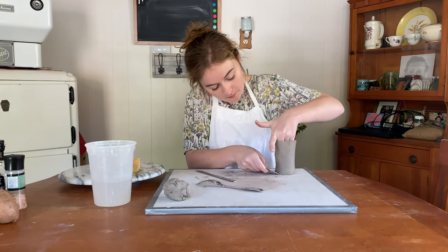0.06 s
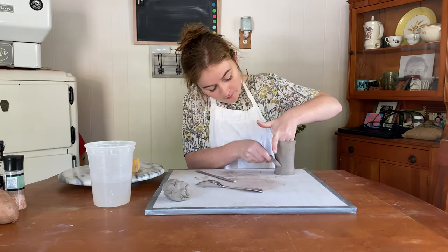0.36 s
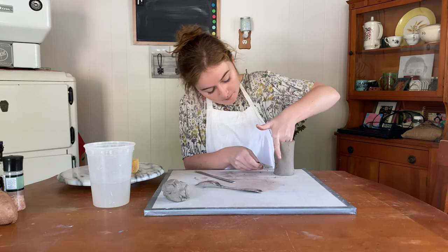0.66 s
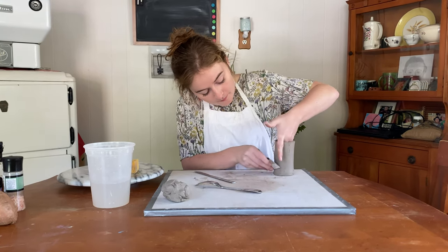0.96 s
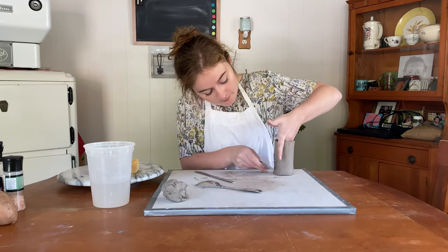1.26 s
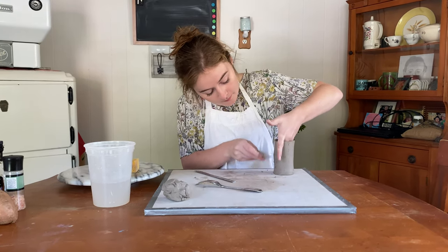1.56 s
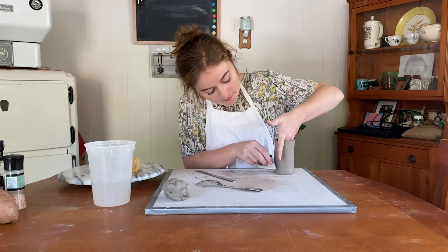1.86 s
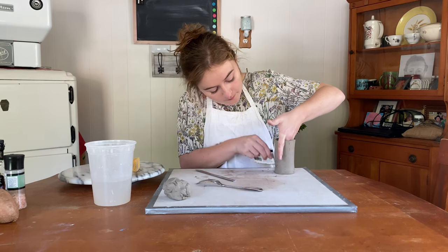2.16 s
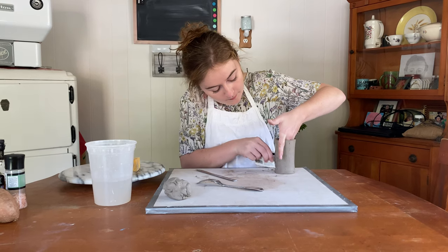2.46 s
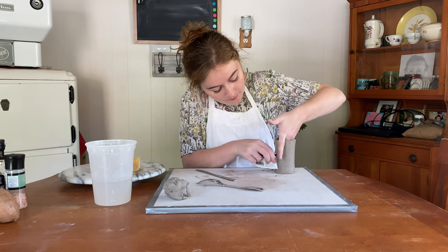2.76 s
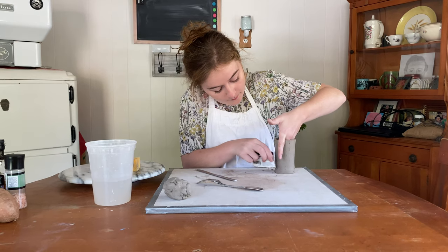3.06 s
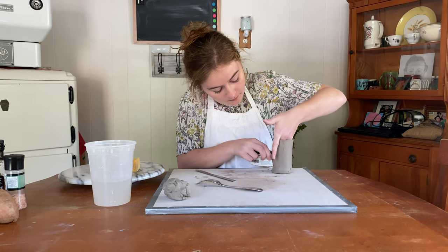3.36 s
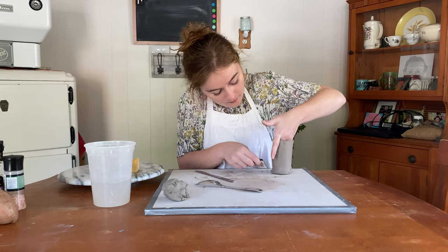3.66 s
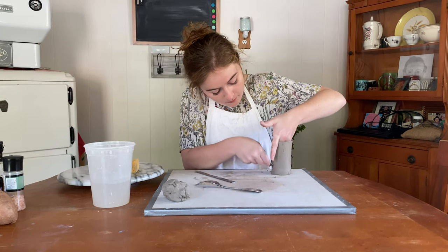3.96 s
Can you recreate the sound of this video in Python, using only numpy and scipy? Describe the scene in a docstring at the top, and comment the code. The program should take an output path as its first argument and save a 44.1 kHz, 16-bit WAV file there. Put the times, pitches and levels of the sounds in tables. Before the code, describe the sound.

A small tool scrapes soft clay in short, gritty strokes, close up in a kitchen, starting faintly around 0.3 seconds. Light taps join from 1.2 seconds and are loudest between 2 and 3, with tiny wet ticks just after 3. One faint, longer stroke comes near 3.9. Throughout, a distant engine drones through the walls with a wash of traffic, its rumble swelling around 2 seconds.

```python
"""A kitchen table, heard close through a stereo pair of microphones.
From the start a distant engine drones through the walls, with its low rumble and a wash of traffic.
A small tool scrapes soft clay in short gritty strokes that stick and slip, ringing briefly in the room.
Light taps and wet ticks join in, loudest between two and three seconds; one faint, longer stroke ends it."""
import sys
import numpy as np
from scipy import signal
from scipy.fft import rfft, irfft
from scipy.io import wavfile

SR = 44100
rng = np.random.default_rng(int(sys.argv[2]) if len(sys.argv) > 2 else 0)


def generate_wav(signal):
    """Clip the signal to [-1, 1] and save it as 16-bit WAV at the path in sys.argv[1]."""
    frames = np.transpose(np.atleast_2d(signal))
    scaled = np.clip(frames, -1, 1) * 32767
    pcm = np.round(scaled).astype(np.int16)
    wavfile.write(sys.argv[1], SR, pcm)


N = 176400
T = np.arange(N) / SR
FREQ_HZ = np.arange(N // 2 + 1) * SR / N

# Spectrum of the clay's fine grit, in strokes and wet ticks: frequency_hz, gain_db
GRIT_SPECTRUM = [(1500, -35), (4000, -7), (6500, -5), (8500, -10.5), (10500, 7.5), (12500, -4.5),
                 (14500, 6.5), (17000, 0)]


def undb(db):
    """Decibels to gain."""
    return 10 ** (np.asarray(db) / 20)


def unit(x):
    """Scale to rms 1."""
    return x / np.sqrt(np.mean(x ** 2))


def curve(rows, column=1):
    """One column of a table, joined by straight lines in time."""
    rows = np.array(rows)
    return np.interp(T, rows[:, 0], rows[:, column])


def pan(left_db):
    """Microphone gains, the left one left_db above the right."""
    return undb(np.array([[left_db], [-left_db]]) / 2)


def wander(rate_hz):
    """Smooth random motion of rms 1."""
    return unit(irfft(rfft(rng.standard_normal(N)) * np.exp(-(FREQ_HZ / rate_hz) ** 2), N))


def colour(x, spectrum):
    """Causal filter through (frequency_hz, gain_db) points that keeps the power of white noise."""
    hz, db = np.array(spectrum).T
    gain = unit(undb(np.interp(np.log(FREQ_HZ + 1), np.log(hz), db)))
    cepstrum = irfft(np.log(gain), N)
    fold = 1 + np.sign(N // 2 - np.arange(N))  # gives minimum phase
    fold[0] = 1
    return irfft(rfft(x) * np.exp(rfft(cepstrum * fold)), N)


def ring(x, modes):
    """Damped resonances of alternating sign that keep the power of white noise."""
    response = sum((-1) ** k * undb(db) * 1j * FREQ_HZ * width
                   / (hz ** 2 - FREQ_HZ ** 2 + 1j * FREQ_HZ * width)
                   for k, (hz, width, db) in enumerate(modes))
    return irfft(rfft(x) * response / np.sqrt(np.mean(abs(response) ** 2)), N)


def diffuse(spectrum, apart_hz):
    """Noise from all round: alike at both microphones in the bass, unrelated above apart_hz."""
    likeness = 1 / (1 + (FREQ_HZ / apart_hz) ** 2)
    mid, side = rfft(rng.standard_normal((2, N)))
    mid, side = mid * np.sqrt((1 + likeness) / 2), side * np.sqrt((1 - likeness) / 2)
    return colour(irfft(np.array([mid + side, mid - side]), N), spectrum)


def room_tone():
    """The faint, steady hiss of the kitchen's still air."""
    # Spectrum of the air: frequency_hz, gain_db
    spectrum = [(200, 13.5), (1000, 0.5), (2200, 5.5), (2800, -4), (4500, -6.5), (6500, -10.5),
                (8500, -17.5), (12000, -16.5), (14000, -27.5), (16000, -26)]
    return undb(-75.5) * diffuse(spectrum, apart_hz=500)


def traffic():
    """A wash of traffic comes through the walls and excites the modes of the room."""
    # Rise and fall of the wash: time_s, relative_level_db
    levels = [(0, -58.5), (.4, -59), (.9, -56.5), (1.3, -57), (1.65, -57), (2.0, -60), (2.45, -56.5),
              (3.0, -60), (3.5, -61), (4, -63.5)]
    # Traffic as heard indoors: frequency_hz, gain_db
    spectrum = [(60, -8.5), (130, 12.5), (170, 4.5), (230, 9), (285, 6), (320, 0.5), (420, -1.5), (520, -5),
                (750, -3.5), (1000, -5), (1400, -11.5), (1800, -21.5), (2400, -30.5), (3000, -40.5),
                (6000, -59.5)]
    # Room modes: frequency_hz, width_hz, gain_db
    room_modes = [(284.3, 17, -3), (392.7, 53, -4), (608, 9.1, 2), (755, 78, -7), (916, 170, -13)]
    wash = diffuse(spectrum, apart_hz=278)
    resonance = undb(-11.5) * ring(rng.standard_normal((2, N)), room_modes)
    level_db = curve(levels) + 4.5 + .5 * wander(18)
    return (wash + resonance) * undb(level_db) * pan(left_db=0.75)


def engine_rumble():
    """The distant engine's low rumble through the walls, swelling midway, a little to the left."""
    # Swell of the rumble: time_s, relative_level_db
    levels = [(0, -62), (.35, -62), (.7, -59), (.85, -56), (1.15, -54), (1.5, -52), (1.95, -48), (2.2, -51),
              (2.4, -50), (2.8, -52), (2.9, -55), (3.3, -55), (3.6, -57), (4, -58)]
    # Spectrum of the rumble: frequency_hz, gain_db
    spectrum = [(20, -32), (32, -24.5), (42, -4.5), (54, 6), (64, 8), (75, -6), (100, -0.5), (140, -14.5),
                (200, -24.5), (400, -76.5)]
    return diffuse(spectrum, apart_hz=308) * undb(curve(levels) + 2.3) * pan(left_db=2.5)


def engine_drone():
    """The engine's unevenly sinking note, a little to the right, with fainter tones that come and go."""
    # Main engine note: time_s, pitch_hz, relative_level_db
    note = [(0.0, 118, -39), (0.42, 114.4, -37), (0.66, 114.6, -44.5), (0.77, 115, -37), (1.06, 113.1, -38),
            (1.17, 114.9, -55), (1.24, 98.5, -62.5), (1.41, 101.7, -48.5), (1.46, 110, -49.5),
            (1.53, 112, -41.5), (2.17, 112, -43), (2.26, 123.9, -54.5), (2.35, 109.1, -47),
            (2.55, 109.1, -42.5), (2.87, 110, -54), (3.03, 107.9, -41), (3.92, 104.6, -40.5),
            (4.0, 103.9, -41)]
    # Fainter engine tones: pitch_hz, wander_hz, peak_s, swell_s, level_db
    tones = [(190.5, 1.3, 2.226, 0.35, -50), (191.7, 2, 2.7, 1, -55.5), (191.4, 3.1, 0.73, 0.14, -59.5),
             (248.3, 6, 2.0, 0.48, -55), (281.3, 4, 1.95, 0.28, -60.5), (255.6, 2.2, .45, 0.34, -62),
             (250.6, 3, 2.84, 0.37, -58.5), (238.3, 4, 3.514, 0.97, -61.5), (221, 2.6, 1.4, 0.21, -66),
             (129.15, 6, 2.09, 1, -53), (85.6, 1.6, 0.71, .45, -50.5), (49.88, 3, 2.7, 0.11, -47.5)]
    pitch_hz = curve(note, column=1) * (1 + 0.0036 * wander(2.7))
    level_db = curve(note, column=2) + 0.5 + 1.5 * wander(26)
    drone = np.sqrt(2) * np.sin(2 * np.pi * np.cumsum(pitch_hz) / SR) * undb(level_db)
    for hz, wander_hz, peak_s, swell_s, db in tones:
        phase = 2 * np.pi * np.cumsum(hz + wander_hz / 2 * wander(3)) / SR
        flutter = undb(1.5 * wander(18))
        swell = np.exp(-((T - peak_s) / swell_s) ** 2)
        drone = drone + unit(np.cos(phase) * flutter) * undb(db) * swell
    return drone * pan(left_db=-3)


def kitchen(x):
    """Direct sound at the two microphones, then a short room tail whose treble dies sooner."""
    low_t60_s, treble_t60_s, gap_s, tail_db = 0.25, 0.19, 0.0013, -2
    t = T[:SR // 2]
    noise = rng.standard_normal((2, len(t)))
    low = signal.sosfilt(signal.butter(1, 4000, fs=SR, output="sos"), noise)
    tail = (low * undb(-60 * t / low_t60_s) + (noise - low) * undb(-60 * t / treble_t60_s)) * (t > gap_s)
    tail /= np.sqrt(np.sum(tail ** 2) / 2)
    # The highest treble reaches the right microphone first.
    lag_s = 0.00012 * np.clip(.5 + 2 * (FREQ_HZ / 7000 - 1), 0, 1)
    left = irfft(rfft(x) * np.exp(-2j * np.pi * FREQ_HZ * lag_s), N)
    return np.array([left, x]) + undb(tail_db) * signal.fftconvolve(x[None], tail, axes=1)[:, :N]


def tool_ring(force):
    """The tool's short hollow ring, with a fainter, longer ring from nearby reflections."""
    # Damped tool resonances: frequency_hz, width_hz, gain_db
    tool_modes = [(1220, 100, -7.5), (1840, 200, 4.5), (2126, 170, 1), (3100, 200, -23), (4020, 280, -18),
                  (4900, 400, -26.5)]
    # Narrow peaks from early reflections: frequency_hz, width_hz, gain_db
    reflection_peaks = [(1659, 25, -2), (1927, 5.1, 0.5), (2177, 14, -2), (2180, 16, -12), (2360, 32, -7.5)]
    return ring(force, tool_modes) + undb(-10.5) * ring(force, reflection_peaks)


def snap(start_s, fade_s=.0008):
    """A very short crackle of unit energy."""
    burst = rng.standard_normal(N) * (T >= start_s) * np.exp(-np.clip(T - start_s, 0, .1) / fade_s)
    return burst / np.sqrt(np.sum(burst ** 2))


def wet_ticks():
    """Wet clay lets go with a tiny bright tick."""
    # Clay letting go: start_s, energy_db
    ticks = [(1.785, -69.5), (3.071, -55), (3.093, -48), (3.354, -53.5)]
    return colour(sum(undb(db) * snap(start_s) for start_s, db in ticks), GRIT_SPECTRUM)


def tapping():
    """The tool knocks on the clay: each blow snaps and sets it ringing."""
    # Taps of the tool: start_s, ring_db, snap_db
    taps = [(0.327, -67, -40.5), (1.2225, -38.5, -41), (1.2265, -40, -52), (1.577, -37.5, -51),
            (2.164, -32, -37.5), (2.185, -41.5, -48), (2.197, -50, -31), (2.526, -43.5, -51),
            (2.574, -30, -31), (2.599, -33, -30.5), (2.996, -35, -34), (3.0725, -29, -39),
            (3.084, -44, -58.5), (3.227, -51.5, -58.5), (3.356, -59.5, -48), (3.879, -43.5, -69)]
    # Spectrum of a tap's snap: frequency_hz, gain_db
    snap_spectrum = [(400, -17), (1000, 1), (2200, -3.5), (2800, -3.5), (3800, 2), (4500, -5), (5500, -8.5),
                     (7500, -18.5), (16000, -40)]
    blows, crackle = np.zeros((2, N))
    for start_s, ring_db, snap_db in taps:
        blows[int(start_s * SR)] += undb(ring_db)
        crackle += undb(snap_db) * snap(start_s)
    return tool_ring(blows) + colour(crackle, snap_spectrum)


def grains(per_s=13000, spread_db=2.5, grip_db=2.15, grip_hz=55):
    """Dense tiny impacts of uneven size, bunched as the clay grips and yields."""
    size_db = spread_db * rng.standard_normal(N) + grip_db * wander(grip_hz)
    hits = rng.random(N) < per_s / SR
    return unit(hits * rng.standard_normal(N) * undb(size_db))


def stick_slip(slips_per_s=135, jitter=.2, fade_cycles=0.16):
    """The edge catches and slips: each cycle gives a fading pulse and one sharp jolt."""
    cycles = np.cumsum(slips_per_s * (1 + jitter * wander(90))) / SR
    pulses = unit(np.exp(-(cycles % 1) / fade_cycles))
    onsets = np.diff(np.floor(cycles), prepend=0)
    return pulses, unit(onsets * undb(wander(150)))


def scraping():
    """Close up, the edge drags through grains of clay; when it chatters, each slip jolts the tool."""
    # Tool strokes, levels relative: start_s, length_s, start_db, end_db, grit_db, ring_db, chatter_share
    strokes = [(0.339, 0.083, -73.5, -71.5, -6, -5, 0.07), (0.421, .02, -71.5, -58.5, -3, -4, 0.07),
               (0.451, 0.044, -68.5, -72, -8, -16, .1), (.882, .035, -75, -81.5, -2, -12, 0.41),
               (1.079, 0.054, -70.5, -74, -1.5, -14.5, 0.07), (1.124, 0.041, -76.5, -76.5, -1, 0, 0.44),
               (1.215, 0.021, -67, -75, 0, 9, 0), (1.469, 0.031, -72.5, -62, 1, 4.5, 0.54),
               (1.506, 0.063, -65, -68, 4, -2, 0.31), (1.56, 0.049, -61.5, -67.5, -2.5, -5, 0),
               (1.895, .03, -81, -84, 3, -9.5, .2), (2.1, 0.04, -75.5, -74.5, -1, 2.5, 0.41),
               (2.142, .014, -56, -64.5, 3, 2.5, .3), (2.157, 0.0057, -55.5, -58.5, 9.5, -0.5, 0.28),
               (2.169, 0.025, -72, -54.5, -2, -10, 0.47), (2.523, .036, -76, -61.5, 0, -13, .5),
               (2.56, .017, -59, -59, 10, 6, 0.1), (2.57, 0.014, -65, -70, -3, -12, 0.1),
               (2.591, 0.0076, -59, -50.5, -11, 1, .4), (2.608, 0.023, -70, -80, -2, -2, 0.7),
               (2.917, 0.027, -70, -58.5, -4, 4.5, 0.6), (2.95, .047, -59, -60, -2.5, 8.5, 0.45),
               (3.545, 0.023, -81.5, -78, -9, 4, 0.56), (3.579, 0.015, -73, -70.5, -17, 8, 0.52),
               (3.864, 0.21, -76.5, -80.5, 3, 1, .3)]
    # Spectrum of clay friction: frequency_hz, gain_db
    clay_spectrum = [(300, -8), (700, 6.5), (1300, 1.5), (2200, 1), (2700, -4), (3800, -5), (5500, -10.5),
                     (7000, -10.5), (9000, -24.5), (16000, -33.5)]
    attack_s, release_s, pulse_depth = 0.0032, .005, 0.16
    pulses, jolts = stick_slip()
    rub = grains()
    drag, grit, shake = np.zeros((3, N))
    for start_s, length_s, start_db, end_db, grit_db, ring_db, chatter in strokes:
        attack = np.clip((T - start_s) / attack_s + .5, 0, 1)
        release = np.exp(-np.clip(T - start_s - length_s, 0, .5) / release_s)
        force = attack * release * undb(np.interp(T, [start_s, start_s + length_s], [start_db, end_db]))
        drag += force * (1 + chatter * pulse_depth * (pulses - 1))
        grit += force * undb(grit_db)
        shake += force * undb(ring_db) * (np.sqrt(chatter) * jolts + np.sqrt(1 - chatter) * rub)
    friction = undb(0.5) * colour(drag * grains(), clay_spectrum)
    fine_grit = undb(-15.5) * colour(grit * grains(), GRIT_SPECTRUM)
    return friction + fine_grit + undb(-6) * tool_ring(shake)


def scene():
    """Clay work at the table, over the sounds from beyond the walls."""
    clay_work = kitchen(scraping() + tapping() + wet_ticks())
    return clay_work + engine_drone() + engine_rumble() + traffic() + room_tone()


def record(dry):
    """The recorder cuts the treble steeply above 15.8 kHz."""
    return signal.sosfilt(signal.ellip(8, .2, 80, 15800, fs=SR, output="sos"), dry)


dry = scene()
out = record(dry)
generate_wav(out)
```